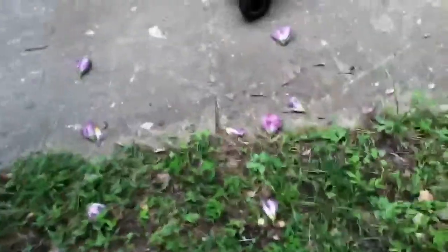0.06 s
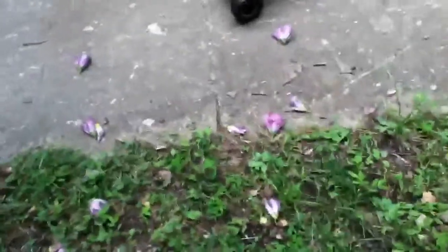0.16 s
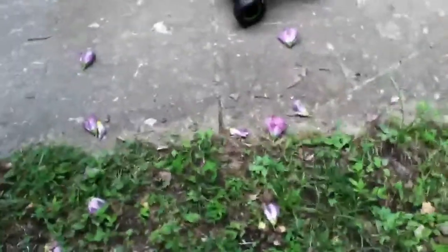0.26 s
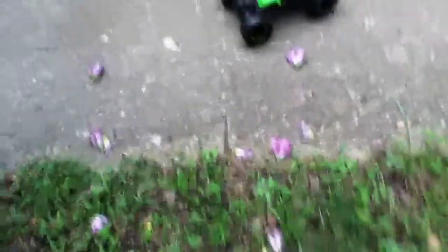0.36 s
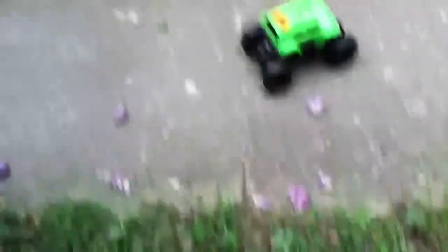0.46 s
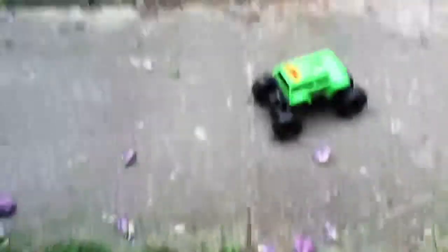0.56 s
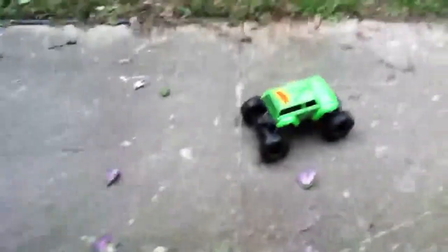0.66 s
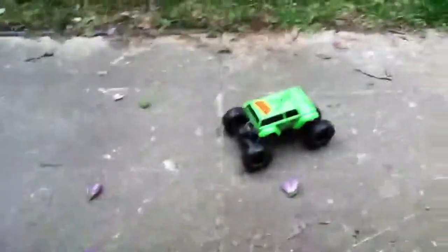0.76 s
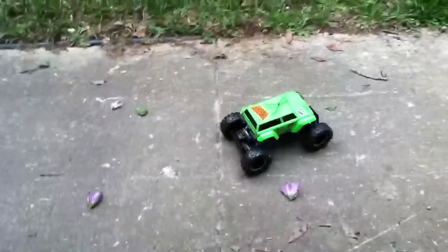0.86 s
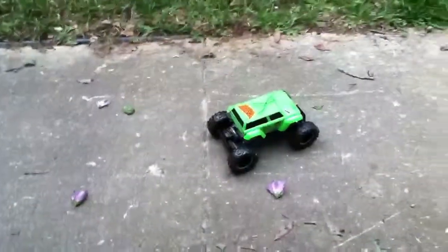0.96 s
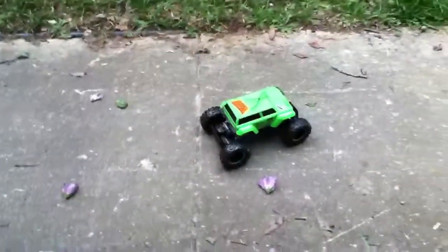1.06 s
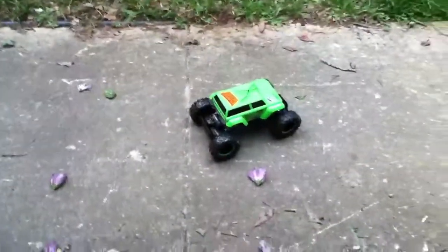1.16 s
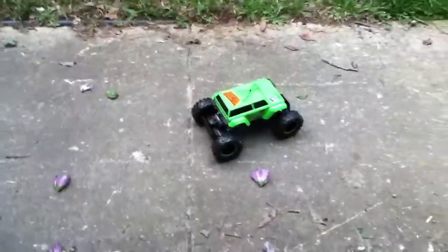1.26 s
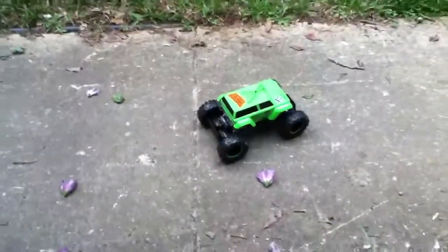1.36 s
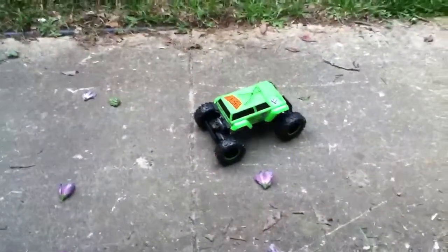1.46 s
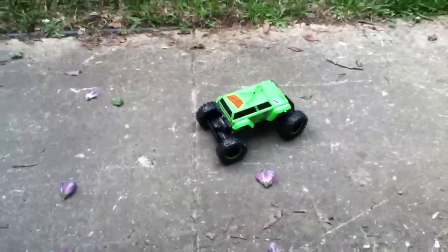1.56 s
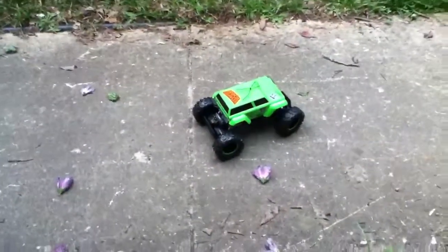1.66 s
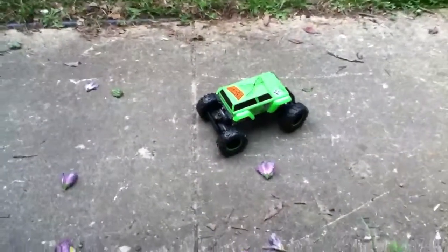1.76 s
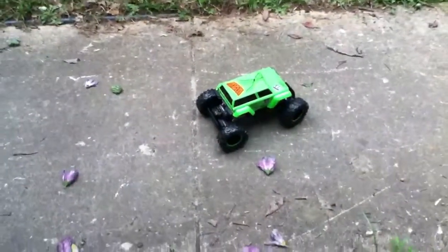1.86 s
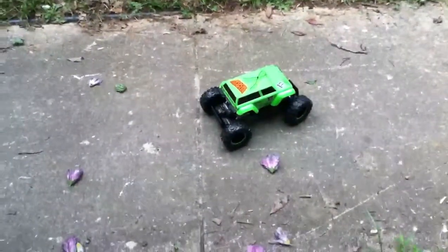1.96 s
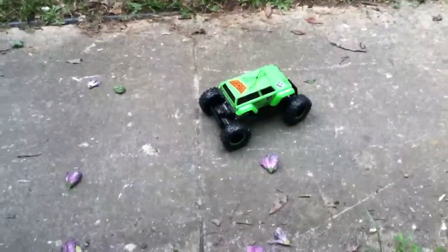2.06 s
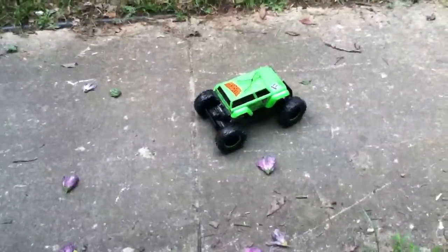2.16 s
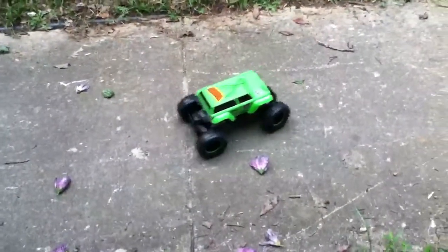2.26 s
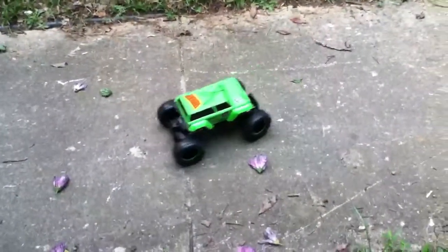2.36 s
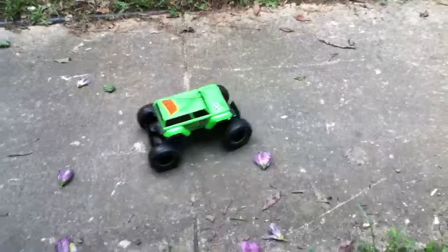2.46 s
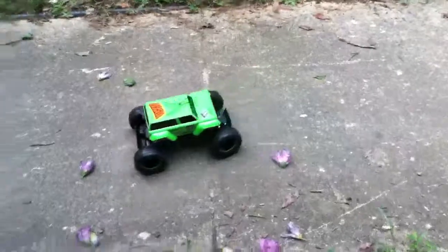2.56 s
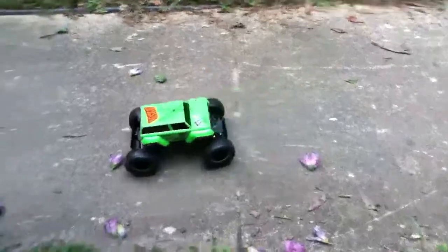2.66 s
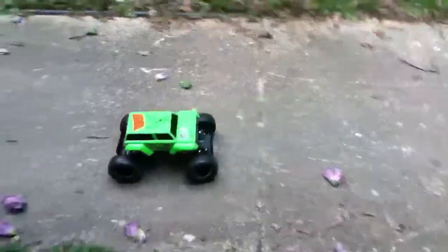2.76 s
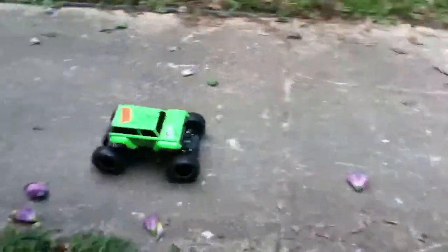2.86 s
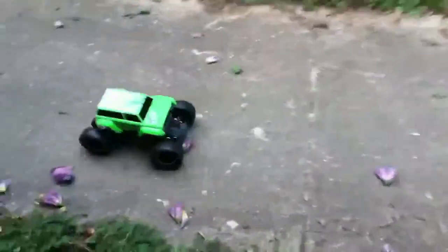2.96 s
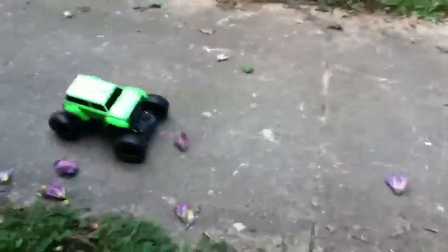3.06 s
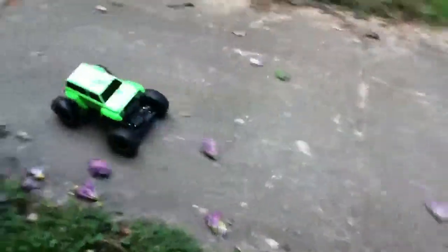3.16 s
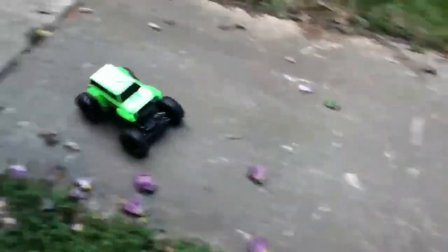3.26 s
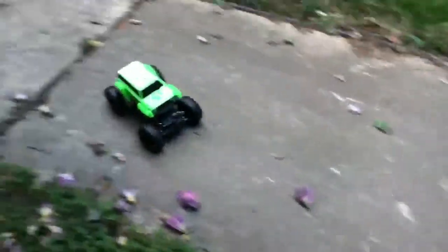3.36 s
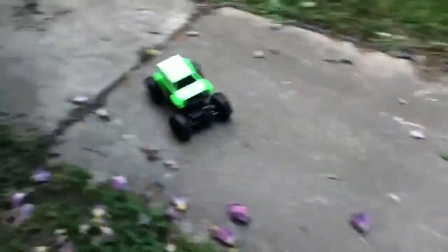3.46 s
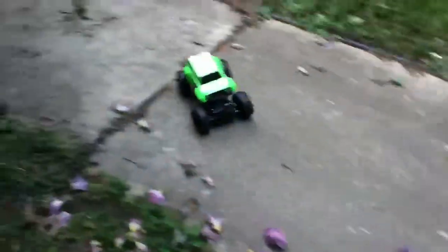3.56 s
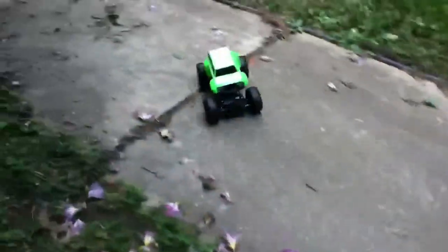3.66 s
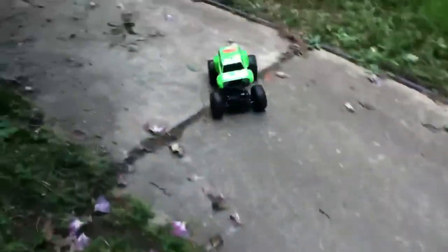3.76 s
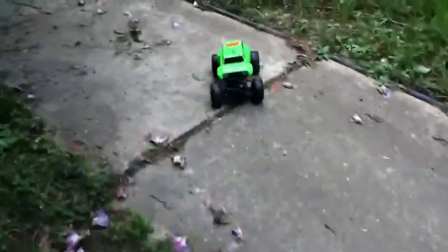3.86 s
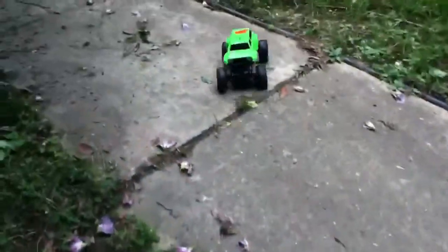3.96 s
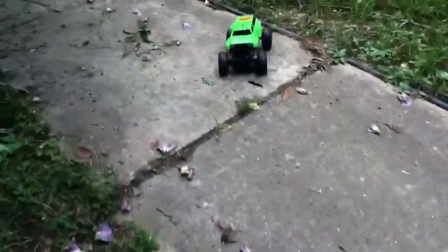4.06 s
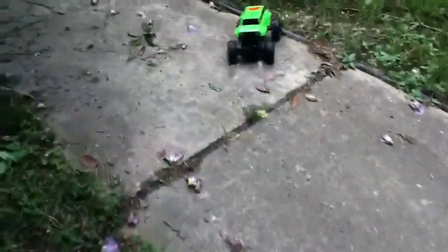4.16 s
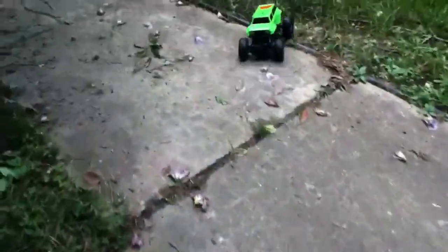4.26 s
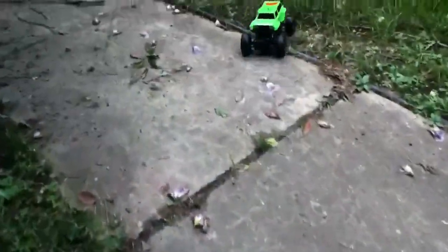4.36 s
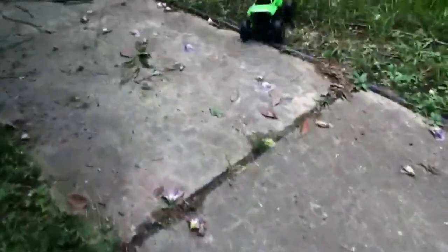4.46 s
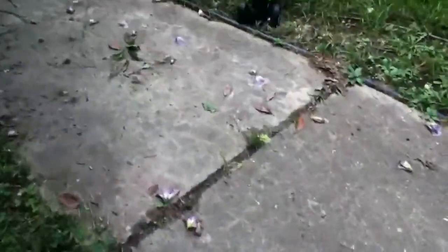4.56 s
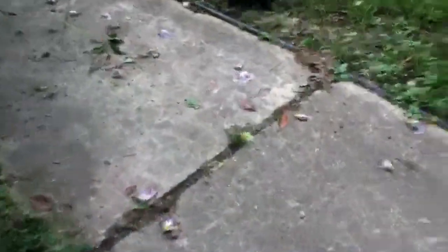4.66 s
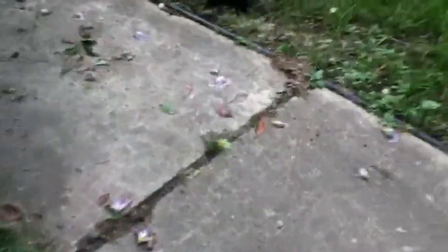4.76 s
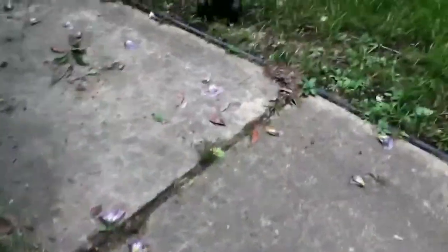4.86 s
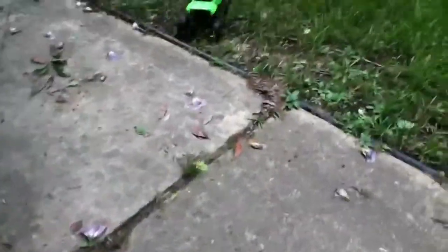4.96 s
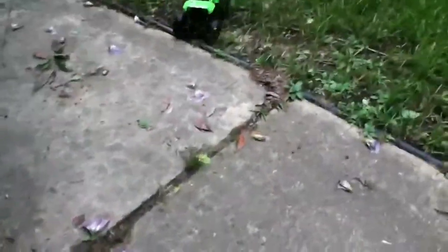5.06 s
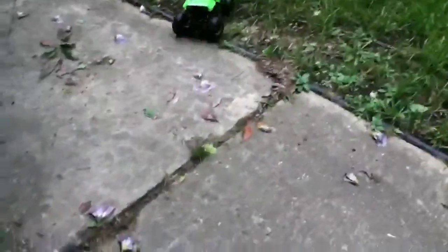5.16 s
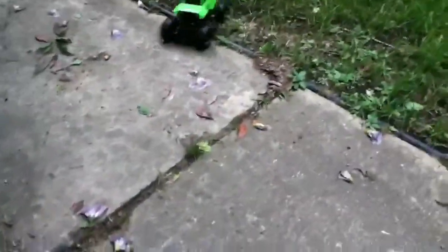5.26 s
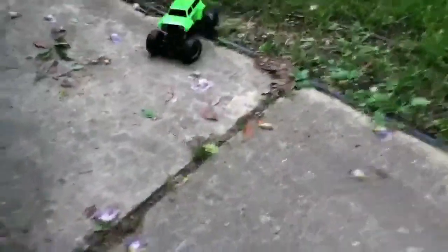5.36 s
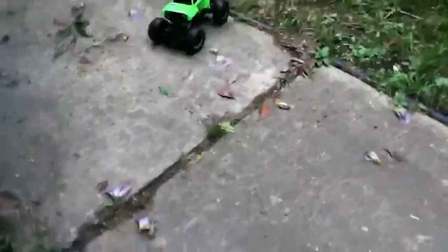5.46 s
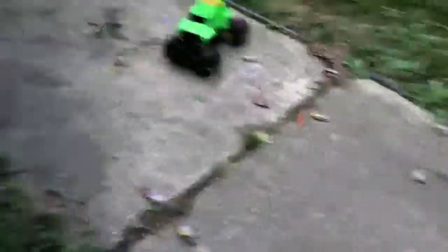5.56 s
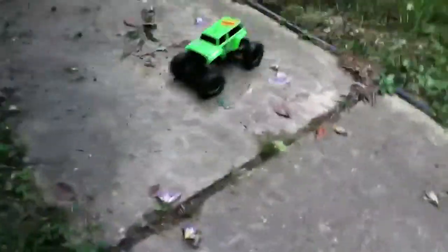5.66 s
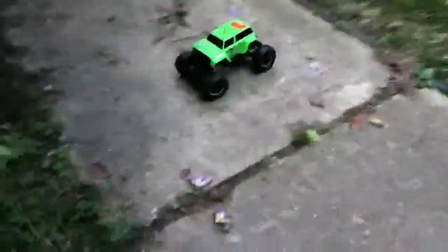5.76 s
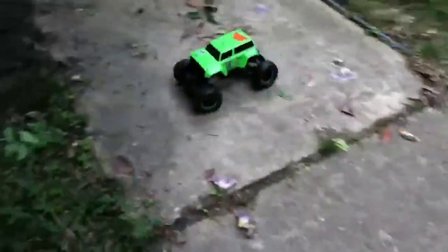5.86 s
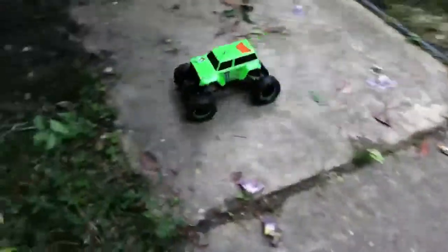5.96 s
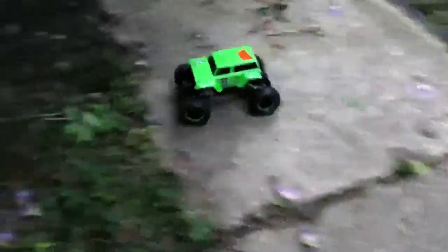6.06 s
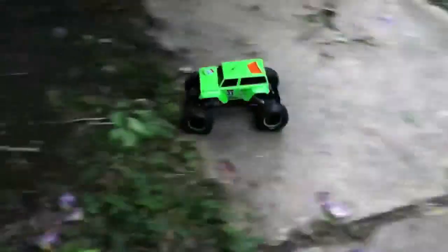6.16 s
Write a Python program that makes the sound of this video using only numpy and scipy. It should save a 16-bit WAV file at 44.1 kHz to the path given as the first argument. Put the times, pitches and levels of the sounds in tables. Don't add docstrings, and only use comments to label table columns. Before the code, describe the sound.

Outdoors, near a phone microphone, faint distant rumble and leaf hiss. A toy truck's steering makes short plastic scrapes and knocks, with pauses. Then its geared motor starts, a buzzing whine climbing quickly in pitch over harsh plastic rattle, with tyre knocks on concrete. It cuts out in a scuff, restarts low after a short gap, and climbs again until the end.

```python
import sys
import numpy as np
from scipy import signal
from scipy.fft import rfft, irfft
from scipy.io import wavfile
from scipy.ndimage import uniform_filter1d

SR = 44100
rng = np.random.default_rng(int(sys.argv[2]) if len(sys.argv) > 2 else 0)


def wav_record(signal):
    frames = np.transpose(np.atleast_2d(signal))
    bounded = np.clip(frames, -1, 1)
    quanta = np.round(bounded * 32767).astype(np.int16)
    wavfile.write(sys.argv[1], SR, quanta)


def makeup_ratio(level_db):
    decades = np.asarray(level_db, float) / 20
    return 10 ** decades


N = 274302

# time [s], tooth rate [Hz], loudness [dB], strain on the teeth [dB].
RUN_AWAY = [(2.31, 470, -47, 6), (2.345, 495, -39, 5), (2.38, 680, -34, 3), (2.405, 775, -31, 2),
            (2.428, 878, -30.5, 2), (2.468, 885, -30, 3), (2.49, 1115, -29, 2), (2.535, 1205, -29, 2),
            (2.588, 1225, -29, 2), (2.605, 1390, -29, 2), (2.685, 1515, -28.5, 4), (2.77, 1510, -28.5, 3),
            (2.84, 1660, -28, 1), (3.19, 1790, -27, -1), (4.0, 1800, -27.5, 1), (4.36, 1978, -31.5, -1.5),
            (4.41, 1770, -28.5, 6), (4.7, 1772, -46, 5)]
RUN_BACK = [(4.861, 478, -50, 6), (4.874, 488, -40, 5), (4.908, 667, -36, 3), (4.94, 738, -34.5, 1),
            (4.95, 615, -34, -2), (4.968, 630, -33.5, 1), (5.01, 875, -32, 2), (5.032, 862, -31.5, 1),
            (5.05, 1020, -30.5, 0), (5.1, 1080, -30, 0), (5.14, 1185, -29, -1), (5.2, 1270, -27.5, -2),
            (5.3, 1440, -28, .5), (5.5, 1565, -29.5, 0), (5.7, 1645, -26.5, 2.5), (5.95, 1790, -28, 1),
            (6.22, 1862, -27, 0.5)]
# time [s], bite [dB], slack before [dB], squeal [dB], kick of speed [%].
BITES_AWAY = [(2.61, 2.5, -1, 3, 1.5), (2.682, 3, .5, 3, .5), (2.723, 3, .5, 1.5, -.5),
              (2.776, 1.5, .5, 4, -1.5), (2.853, 2, -2, 3, 1.5), (2.92, 2, -.5, 4, .5),
              (2.975, 1.5, -.5, 2, .5), (3.045, 1.5, -.5, 3, .5), (3.098, 3.5, -0.5, 5, -4),
              (3.165, 2.5, -2, 2, .5), (3.214, 5, 1.5, 4, 2.5), (3.276, 7, -4, 10, .5),
              (3.333, 3, -0.5, 5, -4), (3.41, 1.5, -.5, 3, .5), (3.469, 2, -1.2, 8.5, 3),
              (3.524, .5, -1.5, 6, -4), (3.552, 3, -.5, 3, .5), (3.603, 4, 1, 3, -4),
              (3.653, 5, -.5, -6, -1.5), (3.762, .6, -6, .5, .5), (3.787, 6, -3, 10, 4),
              (3.848, 2.5, .5, 7.5, 1.5), (3.961, -1, -1.5, 12, 1.5), (4.051, 5, -4, 12, 2.5),
              (4.128, 2, -.5, 4, .5), (4.187, 4, -1.5, 5, 1.5), (4.255, 2.5, -.5, 6, 1.5),
              (4.3, 2.5, -.5, 3, .5), (4.381, 2.5, -4, 1.5, 11), (4.42, 3.5, .5, 4, -1.5),
              (4.443, 5, -.5, 1.5, -.5), (4.461, 4, -3, .5, .5), (4.488, 7, -4, 3, 9),
              (4.516, 7, -0.5, 6, -4.5), (4.553, 4, -2, 6, 1), (4.598, 12, 1, 1.5, 1),
              (4.628, 4, -.5, .5, .5)]
BITES_BACK = [(5.008, 2.5, -.5, 2, .5), (5.047, 3, 0.5, -1.5, -1.5), (5.074, 4, -1, 2, 1.5),
              (5.166, 3, -2, .5, 3), (5.195, 3, -1, -6, -1.5), (5.224, 2, -2.5, .5, -1.5),
              (5.245, 2.2, .5, .5, 2), (5.293, 3.5, -3, 3.5, 1.5), (5.321, 1.5, -2, 3.5, 6),
              (5.352, 4, -.5, 2, .5), (5.405, 4, -2, 5.5, 1.5), (5.449, -1, -1, 8, .5),
              (5.495, 4, 0.5, 4, -1.5), (5.512, 2.5, -.5, 5, -1.5), (5.541, 3, -1.5, 5, -2.5),
              (5.574, 2.5, 1.5, 4, 1.5), (5.618, 2, -.5, 2, .5), (5.655, 2.5, -2, 3, -1.5),
              (5.68, 2.5, -.5, 2, .5), (5.727, 5, -6.5, 5, .5), (5.785, 3, -.5, 5, -1.5),
              (5.838, 3.5, -5, 10, 2.5), (5.862, 2.5, -1.5, .5, .5), (5.884, 5, -1, -3, .5),
              (5.913, -.5, -8, -3, 4), (5.936, 1.2, -.5, .5, .5), (5.971, 10, -3.5, 14, 1.5),
              (6.010, 7, -6, 9, 1.5), (6.064, 5, -.5, 8, 1.5), (6.121, 4, -1.5, 5, 1.5),
              (6.162, .6, -2, .5, .5), (6.19, 5, 2, 6, 3)]
# tooth rate [Hz], tooth tone [dB], octave [dB], higher multiples [dB].
WHINE_AWAY = [(600, -40, -14, -6.5), (880, -25, -4, -6.5), (1150, -14, -3.5, -5.5), (1400, -13, -5.5, -7),
              (1520, -15, 3, -7), (1680, -7, -5, -12), (1800, -5, -9, -11), (1880, -9, -9, -12),
              (1980, -14, -7, -12)]
WHINE_BACK = [(600, -40, -16, -1.5), (880, -28, -8, -3), (1080, -13.5, -1.5, -4), (1150, -21, -10, -6),
              (1260, -24, -13, -11), (1440, -18, -2.5, -14), (1560, -10, .5, -16), (1700, -14, -3, -17),
              (1850, -17, -6, -17)]
# centre [Hz], width [Hz], level driving away [dB], level driving back [dB].
HOUSING = [(1800, 710, -2, -8), (3300, 570, 5.5, 5), (4110, 490, -3, 0), (5500, 400, -4, -6),
           (7500, 500, -6, -16), (6230, 600, -1.5, 3.5), (8850, 1400, -9, -8), (10500, 1900, -18, -6)]
# centre [Hz], width [Hz], level away [dB], level back [dB].
SHELL = [(2880, 150, 9, 0), (2740, 59, -21, 9), (3280, 670, 4.5, 6), (4700, 260, 1.5, -2),
         (5330, 220, 5, -1.5), (5880, 420, 6, -17), (7550, 250, -2, -6), (3150, 120, -10, 4),
         (6600, 400, -12, 2), (8840, 250, -1, -10), (10400, 600, -1.5, -1.5), (4150, 500, -16, 3)]
# frequency [Hz], level [dB per Hz].
RATTLE = [(150, -14), (250, -14), (308, -9), (399, -15), (564, -10), (682, -12.5), (1230, -11), (1830, -2),
          (2180, -5.5), (2970, -2), (4130, -1), (5940, -4), (11500, -6.5), (14400, -17.5), (15700, -22.5)]
# time [s], pitch [Hz], peak [dB].
SQUEAKS = [(2.469, 3220, -29), (2.534, 3650, -27), (2.617, 6780, -30), (2.627, 3810, -28),
           (2.981, 6830, -32), (2.986, 3170, -30), (3.115, 2850, -27), (3.17, 3340, -27),
           (3.188, 2800, -28), (3.208, 3240, -27), (3.243, 2850, -25), (3.278, 7720, -28),
           (3.36, 2870, -28), (3.38, 2950, -28), (3.415, 3260, -27), (3.497, 3260, -27), (3.552, 3460, -28),
           (3.607, 3130, -29), (3.617, 6180, -31), (3.719, 3520, -27), (3.796, 5630, -30),
           (3.899, 2870, -29), (3.993, 5940, -28), (4.195, 5840, -29), (4.2, 3500, -29), (5.106, 3450, -29),
           (5.166, 5350, -32), (5.176, 3190, -27), (5.178, 3800, -30), (5.198, 3140, -26),
           (5.325, 3890, -25), (5.348, 3910, -28), (5.37, 5610, -29), (5.448, 4180, -29),
           (5.498, 5600, -30), (5.625, 3080, -26), (5.687, 5220, -25), (5.807, 4450, -29),
           (5.857, 4960, -31), (5.917, 4690, -31), (5.959, 4270, -30), (6.091, 2700, -29),
           (6.198, 4610, -29)]
# time [s], level [dB], rise per 60 dB [s], hold [s], fall t60 [s].
SCUFFS = [
    [(0.0, -62.5, .01, .06, .05)],
    [(0.155, -35.5, .05, 0.018, 0.06), (.195, -38, .05, .004, .06), (.214, -39, .05, .006, .05),
     (.236, -46, .05, .004, .08), (0.256, -39, .02, .001, .05), (0.31, -43, .1, .012, 0.18)],
    [(0.999, -43, 0, 0.0037, .03)],
    [(1.498, -48, 0.15, .03, .05), (1.524, -34, 0.05, 0.057, .1)],
    [(2.13, -50.5, .2, .06, .075), (2.265, -37, 0.03, .012, .15), (2.33, -37, 0.06, .001, .04)],
    [(4.61, -31.5, 0.33, .001, 0.35), (4.696, -32.5, 0.1, .001, .35), (4.804, -37.5, 0.25, .001, 0.34)],
    [(4.9, -46, .12, .22, .3)],
]
# frequency [Hz], level [dB].
SCUFF_RINGS = [
    [(1500, 19)],
    [(3900, 6), (3220, 6), (5660, 3), (7050, 2), (2050, 0.5)],
    [(1300, 10), (3800, -3)],
    [(3600, 7), (4400, 8), (5200, 3)],
    [(3300, 10), (1870, 5)],
    [(3500, 6), (1900, -3)],
    [(6250, 16), (3300, 10)],
]
# frequency [Hz], level [dB per Hz].
SCUFF = [(180, -41), (300, 2.5), (446, -14), (880, -9), (1220, -6), (1450, -3), (4170, -1.5),
         (10200, -10.5), (11600, -11), (15700, -28)]
# time [s], peak [dB], ring [Hz], t60 [s], crack [dB].
KNOCKS = [(0.17, -37, 890, 0.065, -8), (0.173, -40, 2000, .04, 0.5), (0.176, -40, 310, .08, -10),
          (0.2, -35, 990, 0.037, -8), (.2, -42, 300, .05, -10), (0.255, -40.5, 3200, 0.032, 5),
          (0.618, -55, 3820, .03, -6), (0.998, -42, 1100, 0.064, 6), (1.0, -44, 520, .05, -8),
          (1.288, -46, 880, 0.036, 1), (1.59, -37, 1940, 0.14, -22), (2.195, -41, 990, 0.011, 9),
          (2.266, -44, 3300, 0.04, -4), (2.29, -36.5, 980, 0.042, 0),
          (2.8057, -27, 236.4, 0.06, 16), (2.8065, -33, 110, .09, -20), (2.8295, -16, 520, 0.012, 3.5),
               (2.832, -30, 200, .06, -20), (3.021, -24, 300.3, 0.034, -15), (3.037, -21, 400, 0.029, -2),
               (3.098, -26, 2940, 0.024, 1), (3.12, -31.5, 1490, .05, 8), (3.54, -37.5, 792, 0.058, -9),
               (3.763, -19.5, 3470, 0.01, -6), (3.859, -35.5, 352.5, 0.052, -10),
               (4.556, -32, 595, 0.035, 8), (4.556, -30, 2700, 0.045, -1), (4.562, -33, 950, .03, -10),
               (4.577, -34, 1900, .03, -15), (4.744, -36.5, 814, 0.013, -5), (4.814, -36, 5500, .015, 0),
               (4.833, -38, 3300, 0.01, 7.5), (4.908, -47, 870, 0.17, -8), (4.925, -44, 560, .16, -15)]
# lag [s], level [dB].
ECHOES = [(.0011, -26), (.017, -15), (.031, -16.5), (.052, -21), (.083, -21.5)]
# frequency [Hz], level [dB per Hz].
AIR = [(15, -41), (25, -28), (144, -5), (169, -9.5), (290, -10.5), (447, -16), (554, -15), (976, -19),
       (2130, -20.5), (2310, -20), (2570, -22.5), (3750, -23), (15700, -36.5)]
# time [s], level [dB].
AIR_LEVEL = [(0, -45.5), (.4, -50), (1.05, -51.5), (2.0, -47.5), (2.5, -50.5), (4, -48), (4.6, -49),
             (4.8, -53), (5.1, -50), (6.22, -50.5)]
# time [s], level [dB].
INSECTS = [(1.0, -80), (1.08, -60), (1.4, -63), (1.5, -60.5), (1.7, -80)]
# frequency [Hz], threshold [spreads].
KEPT_BELOW = [(5000, 4.0), (8000, 2.6), (11500, 2.1), (13000, 1.2), (14500, 1.1), (15800, .7)]

PINION_TEETH = 12
LAYSHAFT_RATIO, LAYSHAFT_DB = .44, -24
POWER_OFF_S, COAST_T60_S = 4.545, .12
KICK_S, WANDER_SHARE, WANDERS_PER_S = .04, .012, 18.03
SMALL_BITES_PER_S, SMALL_BITE_DB = 26, .9
BITE_RISE_S, GAP_S, GAP_SHARE = .009, .006, .35
SLIP_S, SAG_HZ, SAG_DB, SAG_FROM_HZ = .045, 42, 6, 1100
TREBLE_FROM_HZ, TREBLE_FOLLOWS, TREBLE_DB = 5500, 1.3, (-.9, .4)
TREBLE_FULL_HZ, TREBLE_SLOW_DB = 950, -16
SQUEAK_S, SQUEAK_FALL_PER_S = .009, 1.5
LEAF_HISS_DB = -50.5


def rms_one(x):
    return x / np.sqrt(np.mean(x ** 2) + 1e-20)


def in_time(rows):
    s, *columns = np.transpose(rows)
    return [np.interp(np.arange(N) / SR, s, c) for c in columns]


def sounding(rows):
    t = np.arange(N) / SR
    return np.clip(np.minimum(t - rows[0][0], rows[-1][0] - t) / 0.0052 + 1, 0, 1)


def drift(rate_hz):
    r = np.exp(-32 * np.pi * rate_hz / SR)
    noise = rng.standard_normal(N // 16 + 2002)
    slow = signal.lfilter([1], [1, -2 * r, r * r], noise)[2000:]
    return np.interp(np.arange(N) / 16, np.arange(len(slow)), rms_one(slow))


def coloured(x, spectrum):
    hz, db = np.transpose(spectrum)
    grid_hz = np.maximum(np.fft.rfftfreq(N, 1 / SR), 1)
    gain = makeup_ratio(np.interp(np.log(grid_hz), np.log(hz), db))
    return rms_one(irfft(rfft(x) * gain, N))


def resonance(x, hz, width_hz):
    r = np.exp(-np.pi * width_hz / SR)
    zeros = np.array([1, 0, -1]) * (1 - r * r) / 2
    return signal.lfilter(zeros, [1, -2 * r * np.cos(2 * np.pi * hz / SR), r * r], x)


def grit(per_s, spread_db):
    sizes = makeup_ratio(spread_db * np.minimum(rng.exponential(1, N), 5)) * rng.choice([-1, 1], N)
    return sizes * (rng.random(N) < per_s / SR)


def gearbox(run, bites, whine, side):
    speed_hz, rattle_db, strain_db = in_time(run)
    since_off_s = np.arange(N) / SR - POWER_OFF_S
    coast_db = -60 * np.clip(since_off_s, 0, None) / COAST_T60_S * (run[0][0] < POWER_OFF_S)
    drive_db = rattle_db + coast_db
    rates_hz, *shares_db = np.transpose(whine)
    first_db, second_db, upper_db = [drive_db + np.interp(speed_hz, rates_hz, share) for share in shares_db]
    sag = slips(bites, run)
    first_db = first_db + strain_db
    second_db = second_db + strain_db / 2 - SAG_DB * np.maximum(sag, 0) ** 2
    upper_db = upper_db + strain_db

    gain, squeal, jolt = backlash(bites)
    sag_hz = SAG_HZ * sag * np.clip(speed_hz / SAG_FROM_HZ - 1, 0, .5) * 2
    tooth_hz = (speed_hz * jolt - sag_hz) * (1 + .006 * drift(60))
    turn = 2 * np.pi * np.cumsum(tooth_hz) / SR / PINION_TEETH
    phase = PINION_TEETH * turn + .1 * np.sin(turn)
    wobble = 1 + 0.23 * np.sin(turn + 2.25 * drift(25.6))

    first = makeup_ratio(first_db + 3.5 + 2.6 * drift(60)) * np.minimum(gain, 1) * np.sin(phase)
    flicker = makeup_ratio(2.0 * drift(50))
    octave = np.sin(2 * phase) + makeup_ratio(-22) * np.sin(3 * phase)
    octave = makeup_ratio(second_db - 0.55) * flicker * squeal * np.sqrt(gain) * octave
    patches = [drift(37), drift(41), drift(40)]
    upper = makeup_ratio(upper_db - 1.5) * squeal ** .7 * high_multiples(run, tooth_hz, phase, patches, side)
    rattle = makeup_ratio(rattle_db - 2.5) * loose_plastic(speed_hz, phase, gain, side)
    layshaft = makeup_ratio(drive_db + LAYSHAFT_DB) * np.clip(speed_hz / 1200 - 1, 0, .5) * 2
    layshaft = layshaft * makeup_ratio(1.5 * patches[0]) * np.sin(LAYSHAFT_RATIO * phase + 1.5 * patches[1])
    return sounding(run) * (layshaft + wobble * octave + gain * wobble * (first + upper) + rattle)


def backlash(bites):
    t, squeal_db = np.arange(N) / SR, np.zeros(N)
    jolt = WANDER_SHARE * drift(WANDERS_PER_S)
    gain_db = SMALL_BITE_DB * drift(SMALL_BITES_PER_S)
    for s, bite_db, slack_db, octave_db, kick_pct in bites:
        near = slice(int((s - .08) * SR), int((s + .15) * SR))
        since = t[near] - s
        onset = np.clip(since / BITE_RISE_S + .5, 0, 1)
        before, after = np.minimum(since, 0), np.maximum(since, 0)
        gain_db[near] += bite_db * onset * np.exp(-(after / 0.019) ** 2)
        slack = np.exp(before / 0.027) + GAP_SHARE * np.exp(before / GAP_S)
        gain_db[near] += 1.47 * slack_db * (1 - onset) * slack
        squeal_db[near] += (octave_db + 1.5) * onset * np.exp(-(after / 0.016) ** 4)
        swing = np.clip(.005 * (bite_db + octave_db / 2), .012, .055)
        jolt[near] += swing * onset * (1 - after / .009) * np.exp(-(after / .02) ** 4)
        jolt[near] += .01 * kick_pct * onset * np.exp(-(after / KICK_S) ** 2)
    return makeup_ratio(gain_db), makeup_ratio(squeal_db), 1 + jolt


def slips(bites, run):
    marks_s = np.concatenate([[run[0][0]], np.array(bites)[:, 0], [run[-1][0] + SLIP_S]])
    counts = np.cumsum(np.maximum(np.round(np.diff(marks_s) / SLIP_S), 1))
    return 2 * (np.interp(np.arange(N) / SR, marks_s, np.append(0, counts)) % 1) - 1


def high_multiples(run, tooth_hz, phase, patches, side):
    blur = .035 * drift(250) * (.1 + tooth_hz / 2000)
    on = slice(int((run[0][0] - .02) * SR), int((run[-1][0] + .02) * SR))
    tones = np.full(N, 1e-18)
    tones[on] = 0
    for k in range(3, 16):
        below_top = np.clip(16000 / (k * tooth_hz[on]) - 1, 0, 1)
        tone = np.sin(k * (phase + blur)[on] + np.sqrt(2) * k * k)
        tones[on] += makeup_ratio(2.8 * patches[k % 3][on]) * tone * below_top
    return sum(makeup_ratio(row[side]) * resonance(tones, *row[:2]) * (-1) ** k for k, row in enumerate(HOUSING))


def loose_plastic(speed_hz, phase, gain, side):
    contacts = grit(25000, spread_db=1.8) * (1 + 0.51 * np.cos(phase))
    contacts = contacts * makeup_ratio(0.8 * drift(45) + 0.7 * drift(115))
    rattle = coloured(contacts, RATTLE)
    rattle = rattle + sum(makeup_ratio(row[side] - 4.5 + 2.4 * drift(38)) * resonance(rattle, *row[:2]) for row in SHELL)
    treble = signal.sosfilt(signal.butter(1, TREBLE_FROM_HZ, "high", fs=SR, output="sos"), rattle)
    slow_db = TREBLE_SLOW_DB * np.clip(1 - speed_hz / TREBLE_FULL_HZ, 0, 1)
    bright = makeup_ratio(TREBLE_DB[side - 2] + slow_db) * gain ** TREBLE_FOLLOWS * treble
    return gain ** 0.69 * (rattle - treble) + bright


def squeaks():
    out, t = np.zeros(N + SR), np.arange(-SR // 25, SR // 25) / SR
    for s, hz, peak_db in SQUEAKS:
        at = round(s * SR) - len(t) // 2
        whistle = np.sin(2 * np.pi * hz * t * (1 - SQUEAK_FALL_PER_S * t / 2))
        out[at:at + len(t)] += makeup_ratio(peak_db) * np.exp(-(t / SQUEAK_S) ** 2) * whistle
    return out[:N]


def scuffs():
    rough = coloured(grit(12000, spread_db=1.0) * makeup_ratio(1.8 * drift(90)), SCUFF)
    out, t = np.zeros(N), np.arange(N) / SR
    for rows, rings in zip(SCUFFS, SCUFF_RINGS):
        rung = rough + sum(makeup_ratio(db) * resonance(rough, hz, 360) for hz, db in rings)
        shapes_db = []
        for s, db, rise_s, hold_s, fall_s in rows:
            away = np.maximum((s - t) / rise_s, (t - s - hold_s) / fall_s)
            shapes_db.append(db - 60 * np.maximum(0, away))
        out += makeup_ratio(np.max(shapes_db, axis=0) - 1.5) * rung
    return out


def knocks():
    out, t = np.zeros(N), np.arange(SR // 8) / SR
    for s, peak_db, hz, t60_s, crack_db in KNOCKS:
        ring = -np.sin(2 * np.pi * hz * t) + 5.9 * resonance(rng.standard_normal(len(t)), hz, 0.62 * hz)
        crack = rng.standard_normal(len(t)) * makeup_ratio(-60 * t / 0.018)
        crack[:9] -= 2.1
        crack = signal.lfilter([.45], [1, -.55], crack)
        at = round(s * SR)
        out[at:at + len(t)] += makeup_ratio(peak_db) * (ring * makeup_ratio(-60 * t / t60_s) + makeup_ratio(crack_db - 5.5) * crack)
    return signal.sosfilt(signal.butter(2, 85, "high", fs=SR, output="sos"), out)


def yard(x):
    dull, out = signal.lfilter([.6], [1, -.4], x), x.copy()
    for lag_s, db in ECHOES:
        lag = int(lag_s * SR)
        out[lag:] += makeup_ratio(db) * dull[:-lag]
    return out


def air():
    rumble_db, = in_time(AIR_LEVEL)
    insects_db, = in_time(INSECTS)
    noise = coloured(rng.standard_normal(N), AIR)
    low = signal.sosfilt(signal.butter(2, 450, fs=SR, output="sos"), noise)
    buzz = rng.standard_normal(N) * (1 + 0.31 * np.sin(2 * np.pi * 40 * np.arange(N) / SR))
    buzz = rms_one(resonance(buzz, 3000, 250) + makeup_ratio(-13) * resonance(buzz, 5800, 500))
    hiss = makeup_ratio(LEAF_HISS_DB + 1.0 * drift(6.2)) * (noise - low)
    return makeup_ratio(rumble_db + 2.5 * drift(9.8)) * low + hiss + makeup_ratio(insects_db) * buzz


def scene():
    away, back = 2, 3
    truck = gearbox(RUN_AWAY, BITES_AWAY, WHINE_AWAY, away)
    truck = truck + gearbox(RUN_BACK, BITES_BACK, WHINE_BACK, back)
    truck = truck + scuffs() + squeaks()
    blows = knocks()
    return (yard(truck + .4 * blows) + .6 * blows + air())[None]


def dropouts(x):
    hz, t, frames = signal.stft(x, SR, nperseg=1024)
    chance = uniform_filter1d(rng.standard_normal((len(hz) // 7 + 1, len(t))), size=3, axis=1)
    chance = np.repeat(chance * np.sqrt(3), 7, axis=0)[:len(hz)]
    kept = chance < np.interp(hz, *np.transpose(KEPT_BELOW))[:, None]
    return signal.istft(frames * kept, SR, nperseg=1024)[1][..., :N]


def low_pass(x):
    return signal.sosfilt(signal.butter(12, 15810, fs=SR, output="sos"), x)


def record(dry):
    rounded = 0.55 * np.tanh(dry / 0.54)
    cut = signal.sosfilt(signal.cheby2(12, 60, 16400, fs=SR, output="sos"), rounded)
    thinned = dropouts(cut)
    return low_pass(thinned)


dry = scene()
out = record(dry)
wav_record(out)
```